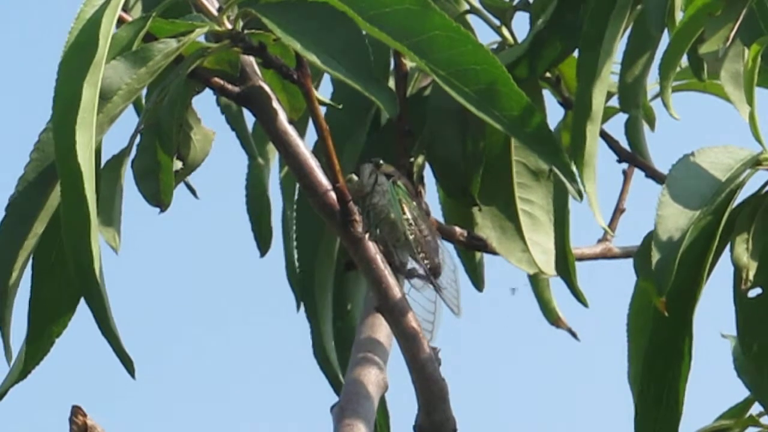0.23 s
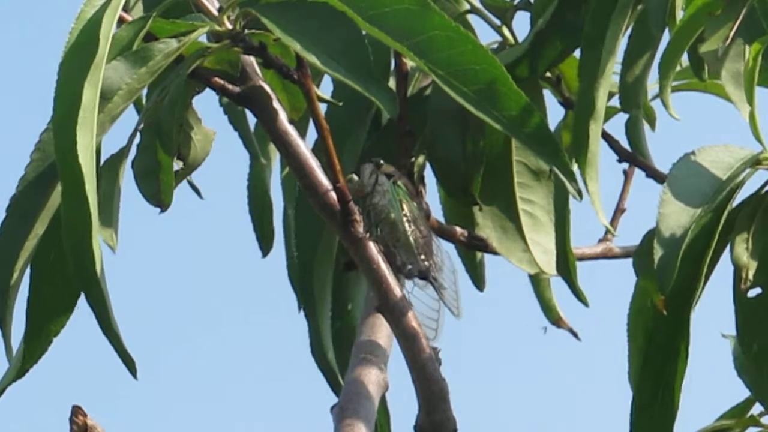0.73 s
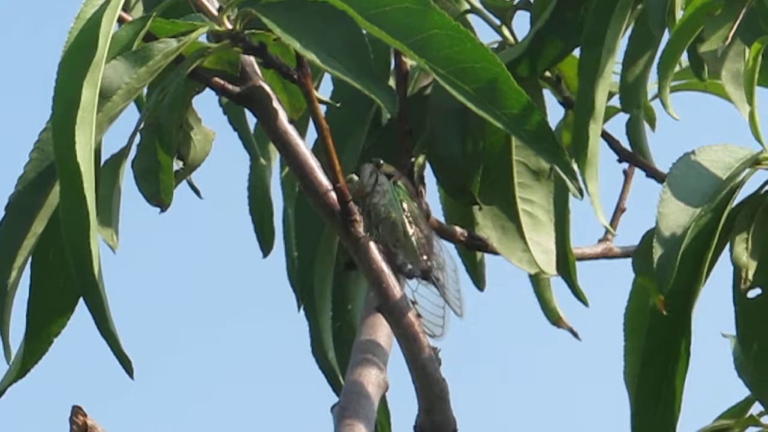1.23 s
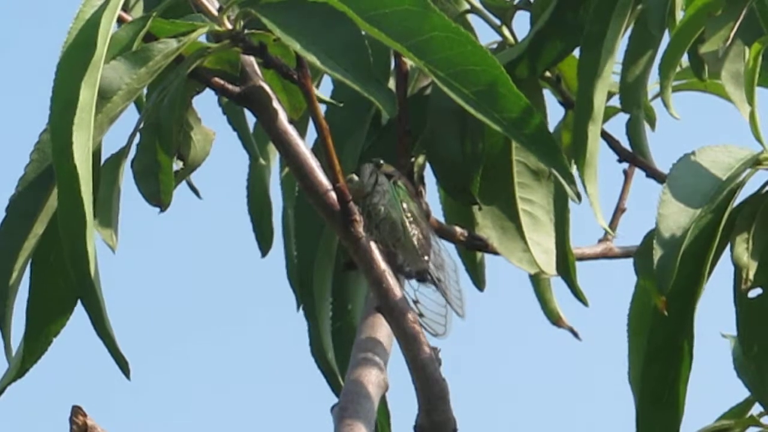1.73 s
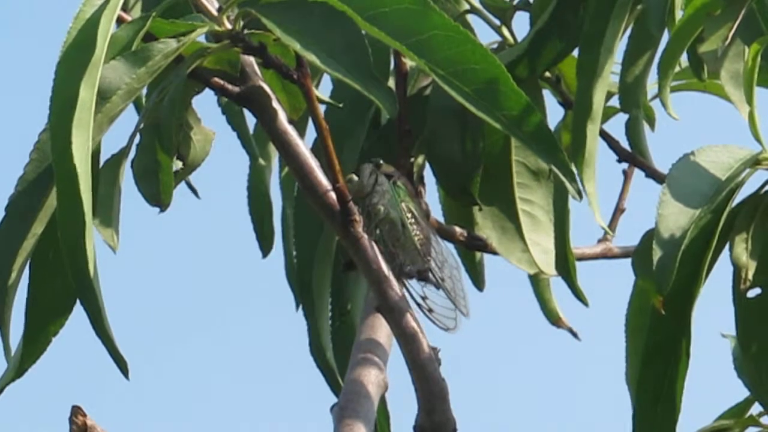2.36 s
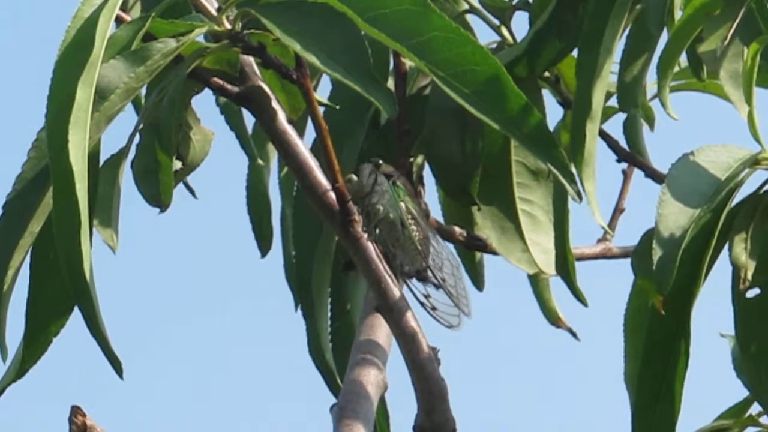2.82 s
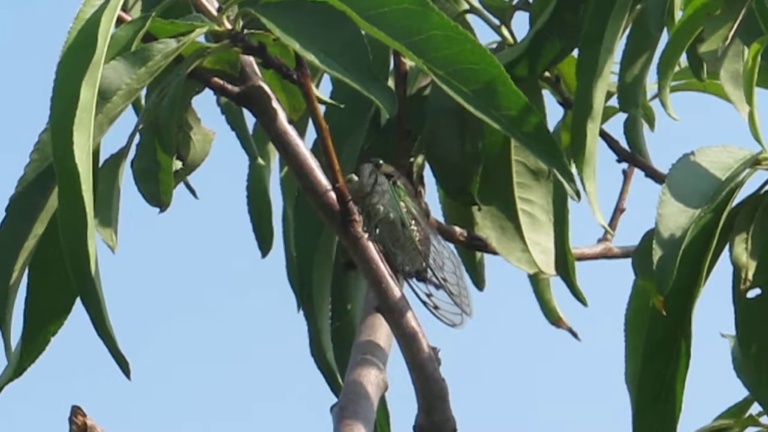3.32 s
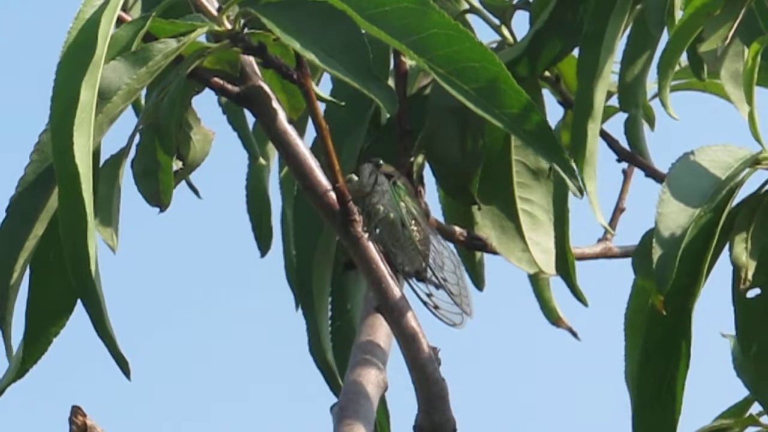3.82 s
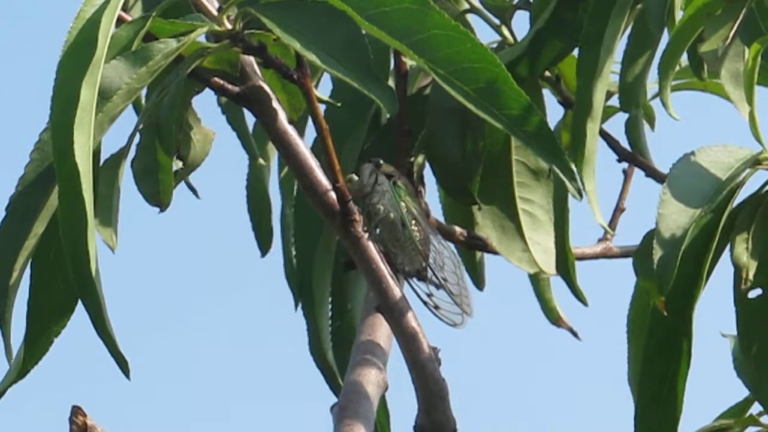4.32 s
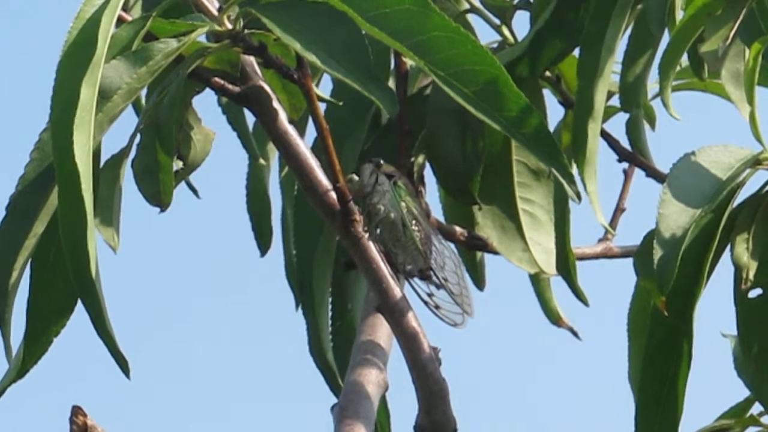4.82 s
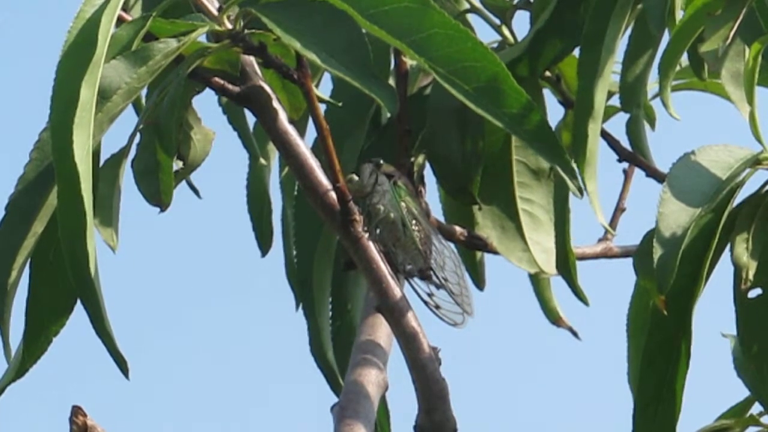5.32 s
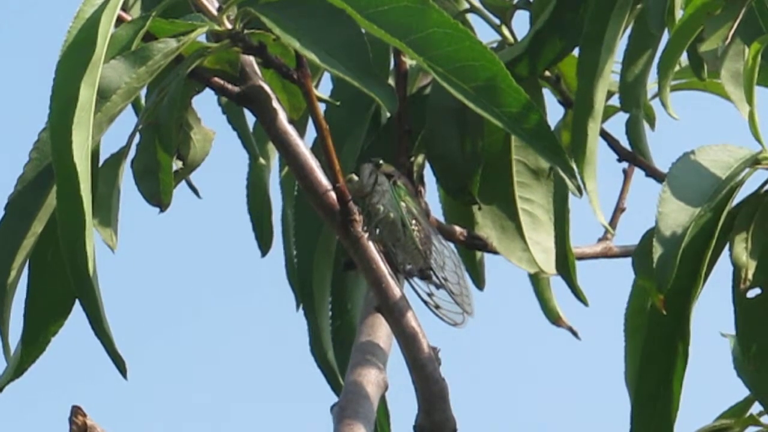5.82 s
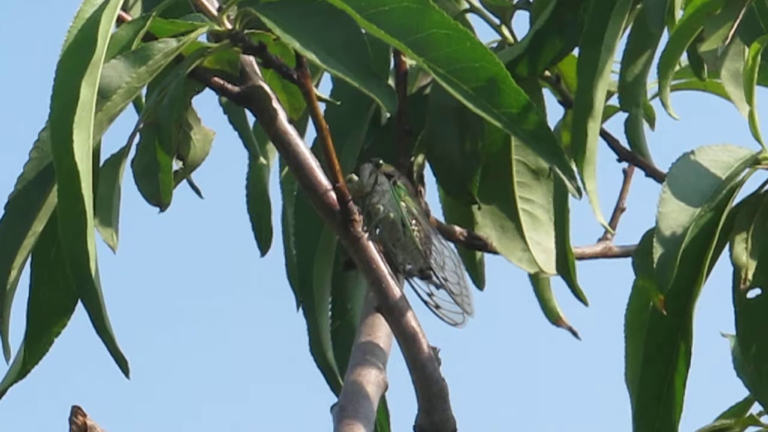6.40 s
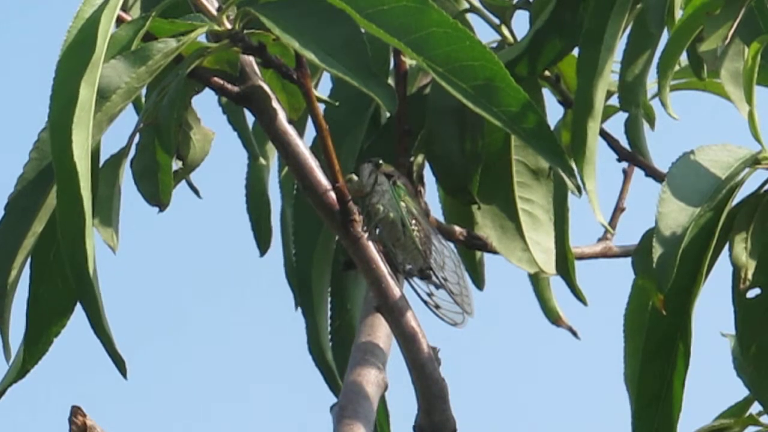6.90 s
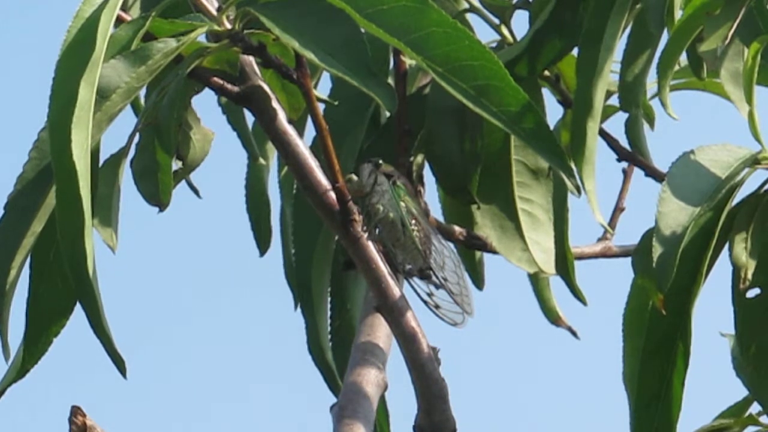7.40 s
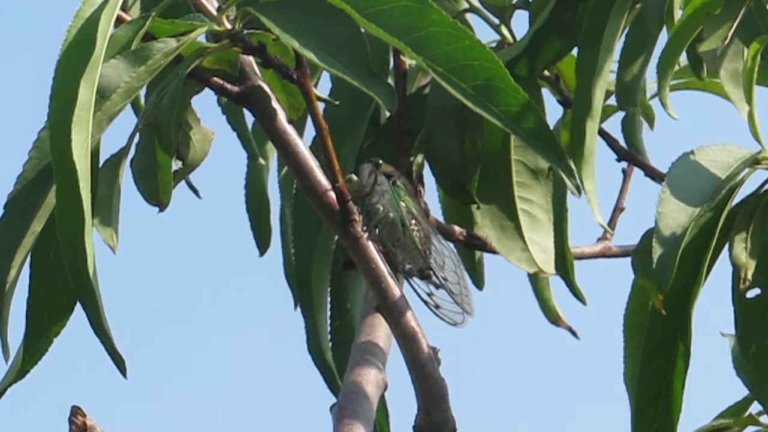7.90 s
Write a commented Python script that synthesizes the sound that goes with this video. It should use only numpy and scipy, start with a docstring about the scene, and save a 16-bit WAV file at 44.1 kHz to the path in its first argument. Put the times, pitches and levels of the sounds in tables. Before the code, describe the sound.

Loud, pulsing cicada buzz in a tree winds down to a ragged rattle and quits halfway, uncovering faint insects and steady low road noise.

```python
"""Cicada in a fruit tree, close to the microphones

A cicada's tymbals buckle rib by rib; each click rings fixed modes and a resonance swept by the pumping
abdomen. The throbbing buzz slows to a rattle, stumbles and stops. Leaves scatter it on its way.
Around it small insects tick (falling notes with a rasp) and chirp (pulsed bands of noise), and far ones hiss.
On a road some way off traffic swells and stays: shaped noise for rumble and tyres, a sine for the engine,
narrow noise for whines."""
import sys
import numpy as np
from scipy import signal
from scipy.fft import rfft, irfft, next_fast_len
from scipy.io import wavfile
from scipy.ndimage import uniform_filter1d

SR = 44100
rng = np.random.default_rng(int(sys.argv[2]) if len(sys.argv) > 2 else 0)


def master(y):
    """Save y as 16-bit WAV."""
    cut = np.clip(np.atleast_2d(y).T, -1, 1)
    pcm = np.round(cut * 32767)  # scale
    wavfile.write(sys.argv[1], SR, pcm.astype(np.int16))


N = 359856
TIME = np.arange(N) / SR

# The last stumbling strokes. Each row: time in seconds, level in dB beside a steady stroke.
LAST_STROKES = [(4.198, -0.5), (4.217, -1.5), (4.223, -2), (4.233, -0.5), (4.244, 2), (4.255, 0),
                (4.281, -4), (4.293, -8), (4.298, -3), (4.311, -0.5)]


def vigour_at(s, full_song_s=0.92, tiring_s=0.71):
    """The insect's vigour: 1 in full song, then fading towards 0 with the tiring time constant."""
    return np.exp(-np.maximum(s - full_song_s, 0) / tiring_s)


def rib_clicks(stroke_jitter=0.011, tired_jitter=0.0404, rib_jitter_ms=0.064, scatter_db=1.42):
    """Each muscle stroke buckles four ribs in turn; gives time, level and pitch ratio of every click."""
    # Pace of the muscle. Each row: time in seconds, strokes per second, gap between ribs in ms.
    stroke_pace = [(0, 238, 1.07), (.4, 222, 1.28), (.8, 228, 1.11), (1.3, 197, 1.19), (2, 180, 1.28),
                   (2.45, 149, 1.45), (3.25, 114, 1.4), (3.42, 120, 1.3), (3.7, 112, 1.33),
                   (4.2, 94.5, 1.26)]
    # Ribs in buckling order. Each row: place in rib gaps, level in dB in full song,
    # level in dB when tired, pitch ratio of the abdomen's ring.
    ribs = [(0, 0, -8, 0.92), (1, -3.5, 2, 0.98), (2, 0, -8.5, 1.034), (3, -1.5, -.5, 1.055)]
    last_s, last_db = np.transpose(LAST_STROKES)
    strokes_so_far = np.cumsum(curve(stroke_pace, TIME)[0]) / SR
    steady_count = int(np.interp(last_s[0], TIME, strokes_so_far))
    steady_s = np.interp(np.arange(steady_count), strokes_so_far, TIME)
    start = np.r_[steady_s, last_s]
    stroke_db = np.r_[0 * steady_s, last_db]
    # column 0 shifts the stroke, 1-4 shift its ribs, 5-8 scatter their levels
    chance = rng.standard_normal((900, 9))[:len(start)]
    rate, gap_ms = curve(stroke_pace, start)
    vigour = vigour_at(start)[:, None]
    # the strokes grow less even as the insect tires
    jitter = vigour * stroke_jitter + (1 - vigour) * tired_jitter
    start = start[:, None] + chance[:, :1] / rate[:, None] * jitter
    order, full_db, tired_db, ratio = np.transpose(ribs)
    when = start + (order * gap_ms[:, None] + rib_jitter_ms * chance[:, 1:5]) / 1000
    rib_db = vigour * full_db + (1 - vigour) * tired_db
    db = stroke_db[:, None] + rib_db + scatter_db * chance[:, 5:]
    return when.ravel(), db.ravel(), np.tile(ratio, len(start))


def cicada(abdomen_db=0, abdomen_ms=0.49, pause_at=.815, pause_width=0.068, pause_db=25,
           detune=0.031, song_db=3, first_crest_s=.047):
    """Rib clicks ring the swept abdomen and the fixed modes of the tymbal and thorax."""
    # Unsteady pumping of the abdomen. Each row: time in seconds, pumps per second.
    pump_pace = [(0, 16.07), (.98, 18.29), (1.02, 18.81), (2.25, 18.64), (3.26, 16.69), (3.48, 18.57),
                 (3.95, 14.97), (4.2, 18.3)]
    # One pump from crest to crest. Each row: share of the cycle, abdomen resonance in Hz in full song,
    # the same in Hz when tired (both before rib ratio and detuning), level in dB at full throb.
    pump_cycle = [(0, 5950, 4600, 4.5), (.12, 4940, 4260, 1.5), (.26, 4100, 3650, -4),
                  (.42, 3000, 3380, -1), (.56, 4100, 3760, -.3), (.68, 5150, 4600, -.3),
                  (.8, 5950, 5300, 1.3), (.88, 6750, 5900, 2.5)]
    # Each row: time in seconds, factor on the pump's level in dB.
    throb_depth = [(0, 1), (2.1, 1.3), (2.9, 0.22), (3.4, 0.77), (3.8, .15)]
    # Each row: mean frequency in Hz, decay in ms, level in dB in full song, level in dB when tired.
    tymbal_modes = [(4730, 1.6, -22, -9), (6170, .8, -2, -1), (6950, .7, -1, -6), (8050, .4, -4.3, -3.8),
                    (10200, .25, -29.5, -10.5), (12000, .07, -15.5, -6)]
    # Loudness at the insect. Each row: time in seconds, level in dB before song_db is added.
    song_level = [(0, -24.8), (.6, -24), (1.4, -26), (2, -25.5), (2.9, -29.5), (3.2, -30), (3.33, -26.8),
                  (3.95, -28.5), (4.2, -30)]
    when, db, ratio = rib_clicks()
    pumps = np.cumsum(curve(pump_pace, TIME)[0]) / SR
    phase = (np.interp(when, TIME, pumps) - np.interp(first_crest_s, TIME, pumps)) % 1
    share, *columns = np.transpose(pump_cycle)
    full_hz, tired_hz, pump_db = (np.interp(phase, share, c, period=1) for c in columns)
    vigour = vigour_at(when)
    throb = curve(throb_depth, when)[0]
    abdomen_hz = vigour * full_hz + (1 - vigour) * tired_hz
    # in full song the tymbals rest for a moment just before each crest
    pause = np.exp(-((phase - pause_at) / pause_width) ** 8)
    gain = undb(db + throb * pump_db - pause_db * vigour * pause)
    spread = rng.standard_normal((len(when), 1 + len(tymbal_modes))).T
    click_hz = abdomen_hz * ratio * (1 + detune * spread[0])
    song = rings(when, click_hz, abdomen_ms, gain * undb(abdomen_db))
    for k, (mode_hz, decay_ms, full_db, tired_db) in enumerate(tymbal_modes):
        # the upper modes swing against the abdomen
        sign = 1 if k < 2 else -1
        mode_gain = sign * gain * undb(vigour * full_db + (1 - vigour) * tired_db)
        # broad modes vary more from click to click than sharp ones
        varied_hz = mode_hz + 70 * spread[k + 1] / decay_ms
        song = song + rings(when, varied_hz, decay_ms, mode_gain)
    # the effort sets the loudness, averaged over several pumps; its divisor holds once the strokes stumble
    power = uniform_filter1d(song ** 2, size=9600)
    held_power = np.interp(np.minimum(TIME, LAST_STROKES[0][0]), TIME, power)
    effort = undb(curve(song_level, TIME)[0] + song_db) / np.sqrt(held_power)
    return song * effort


def tree(song, leaves_db=-10.5, leaves_t60=0.065, echo_db=-12, echo_s=.001675):
    """The song reaches the microphones directly, off one surface close by, and scattered by the leaves."""
    # The way from the insect to each microphone. Each row: frequency in Hz, gain in dB.
    to_left = [(1500, -31.5), (2400, -12), (3100, -1.5), (4200, 1), (4500, -1.5), (4850, 3), (5500, 1.5),
               (6200, -2), (6800, -13), (7400, -17), (8400, -19), (9400, -22.5), (12000, -18.5),
               (15500, -29)]
    to_right = [(1500, -31), (2400, -11.5), (3100, -1.5), (4200, 0), (4500, -4.5), (4750, -5), (5250, 1),
                (6200, 2.5), (6800, -1), (7400, 1.5), (8400, -1), (9400, -2.5), (12000, -5.5), (15500, -13)]
    song = song + undb(echo_db) * np.interp(TIME - echo_s, TIME, song)
    age = TIME[:8192]
    # decaying noise, starting 2 ms after the direct sound
    scatter = rng.standard_normal((2, len(age))) * undb(-60 * age / leaves_t60) * (age > .002)
    scatter *= undb(leaves_db) / np.sqrt(np.sum(scatter ** 2, axis=1))[:, None]
    sides = []
    for leaves, path in zip(scatter, (to_left, to_right)):
        leafy = signal.fftconvolve(song, leaves)[:N]
        sides.append(colour(song + leafy, path))
    return np.array(sides)


def tickers(crest=0.32, length=0.21):
    """Each wing stroke of a katydid scrapes a short falling note, with a faint broad rasp."""
    # Each row: strokes per second, time in seconds when one cycle starts, top of the note in Hz,
    # fall per cycle in Hz, waver in Hz, mean level in dB, rasp beside the note in dB, right minus left in dB.
    katydids = [(29.2, 4.331, 8680, 1500, 140, -45, -15.5, 18.5),
                (77.2, 4.334, 6150, 1500, 100, -47.5, -11, 0), (89.4, 4.34, 5900, 1500, 100, -53, -12, -1)]
    out = 0
    for rate, cycle_s, top_hz, fall_hz, waver_hz, db, rasp_db, right_db in katydids:
        phase = ((TIME - cycle_s) * rate + 0.036 * walk(5)) % 1
        hz = top_hz - fall_hz * phase + waver_hz * walk(900)
        tone = np.sin(2 * np.pi * np.cumsum(hz) / SR) * undb(2 * walk(700))
        rasp = undb(rasp_db + 2.6 * walk(30)) * noise_band(top_hz - fall_hz * crest, 3010)
        stroke = np.exp(-((phase - crest) / length) ** 2)
        level = undb(db + 0.78 * walk(20))
        out = out + place((tone + rasp) * stroke * level, right_db, lag_ms=0.023)
    return out


def chirpers(length=0.17):
    """Two small insects pulse narrow bands of noise into soft, high chirps, each at its own pace."""
    # Each row: middle of one chirp in seconds, chirps per second, pitch in Hz, width in Hz,
    # level in dB up to that chirp, fading after it in dB per second (negative grows).
    chirping_insects = [(4.412, 5.505, 9020, 300, -55.5, -0.5), (4.425, 6.15, 9730, 330, -59.5, 4)]
    out = 0
    for chirp_s, rate, hz, width_hz, db, fade_db in chirping_insects:
        phase = ((TIME - chirp_s) * rate + .5) % 1 - .5
        chirp = noise_band(hz, width_hz) * np.exp(-(phase / length) ** 2)
        out = out + chirp * undb(db - fade_db * np.maximum(TIME - chirp_s, 0))
    return place(out, right_db=12.0, lag_ms=0)


def traffic(rumble_db=2, tyres_db=1, drone_db=-7, diffuse_db=-11, rumble_waver_db=1.3,
            drone_waver_db=2.5, waver_hz=1.6, engine_hz=146.1, engine_sag_hz_per_s=1.05):
    """Low rumble, a wavering and slowly sinking engine drone and the roar of tyres, leaning to the right."""
    # The traffic draws near and stays. Each row: time in seconds, level in dB that all three parts follow.
    road_level = [(0, -47), (.95, -45), (4.16, -32), (8.16, -31.5)]
    # Outlines of the two noises. Each row: frequency in Hz, relative level in dB per Hz.
    rumble_shape = [(15, -18), (30, -10), (50, -1.5), (70, 0.5), (110, 0), (140, -4.5), (175, -11),
                    (220, -23), (400, -43.5), (2000, -100)]
    tyre_shape = [(100, -16.5), (200, 1), (290, -4), (360, -1.5), (450, -3), (620, -1.5), (800, 2.5),
                  (1000, -0.5), (1300, -2.5), (1700, -8), (2200, -13), (3000, -21.5), (4500, -27),
                  (9000, -40), (15000, -47)]
    # Brief surges of the rumble, swells of the drone. Each row: middle in seconds, length in seconds, rise in dB.
    rumble_surges = [(3.95, .35, 2), (5.2, 0.19, 5), (6.2, .25, 1.5)]
    drone_swells = [(1.8, .5, 4), (4.2, 1.23, 8), (6.7, .6, 3.5), (7.947, 0.69, 11.7)]
    road_db, = curve(road_level, TIME)
    surge_db = sum(db * swell(s, length) for s, length, db in rumble_surges)
    swell_db = sum(db * swell(s, length) for s, length, db in drone_swells)
    rumble_level_db = road_db + rumble_db + surge_db + rumble_waver_db * walk(4.014)
    rumble = unit(colour(rng.standard_normal(N), rumble_shape)) * undb(rumble_level_db)
    hz = engine_hz - engine_sag_hz_per_s * TIME + waver_hz * walk(12)
    drone_level_db = road_db + drone_db + swell_db + drone_waver_db * walk(12)
    drone = np.sqrt(2) * np.sin(2 * np.pi * np.cumsum(hz) / SR) * undb(drone_level_db)
    direct, *scattered = unit(colour(rng.standard_normal((3, N)), tyre_shape))
    # scattered sound differs between the microphones only at shorter wavelengths
    diffuse_shape = [(200, -14.5), (600, -5.0), (1200, 2.5), (3000, 3.5)]  # Hz, dB
    diffuse = colour(np.array(scattered), diffuse_shape) * undb(diffuse_db)
    tyres = (place(direct, right_db=2, lag_ms=0.077) + diffuse) * undb(road_db + tyres_db)
    return place(rumble + drone, right_db=2.6, lag_ms=0.054) + tyres


def whines(width_hz=14):
    """Far engines whine faintly: narrow bands of noise rise out of the traffic and sink back."""
    # Each row: middle in seconds, length in seconds, pitch in Hz, level in dB at the height.
    engine_whines = [(5.75, 0.27, 247, -38), (6.12, 0.2, 258, -39), (5.6, 2.2, 356, -47)]
    tones = sum(noise_band(hz, width_hz) * undb(db) * swell(s, length) for s, length, hz, db in engine_whines)
    return place(tones, right_db=1.5, lag_ms=.06)


def chorus(left_db=-51, right_db=-49):
    """Far insects merge into a fine shimmering hiss, separate noise at each microphone."""
    # Insects and air at each microphone. Each row: frequency in Hz, relative level in dB per Hz.
    left_shape = [(2000, -22), (3500, -5), (4800, 1.5), (5700, 1), (6200, -4), (6900, -14), (8200, -12),
                  (9500, -24), (12000, -26), (15500, -31)]
    right_shape = [(2000, -17), (3500, -27), (4800, -16), (5800, .5), (6600, -1), (7400, 3), (8200, 0),
                   (9500, -17), (12000, -28), (15500, -43)]
    sides = []
    for shape, db in ((left_shape, left_db), (right_shape, right_db)):
        hiss = unit(colour(rng.standard_normal(N), shape))
        sides.append(hiss * undb(db + 1.5 * walk(70)))
    return np.array(sides)


def undb(db):
    """Decibels to gain."""
    return 10 ** (np.asarray(db) / 20)


def curve(table, at):
    """The columns of a table, read at the given times."""
    s, *columns = np.transpose(table)
    return [np.interp(at, s, c) for c in columns]


def unit(x):
    """Scale to rms 1."""
    return x / np.sqrt(np.mean(x ** 2))


def colour(x, points):
    """Causal minimum-phase filter with the given (Hz, dB) outline."""
    hz, db = np.transpose(points)
    size = next_fast_len(N + 4096, True) // 2 * 2
    grid = np.maximum(np.arange(size // 2 + 1) * SR / size, 1)
    outline_db = np.interp(np.log(grid), np.log(hz), db)
    # folding the cepstrum onto positive times makes the filter causal
    cepstrum = irfft(np.log(undb(outline_db)))
    cepstrum[1:size // 2] *= 2
    cepstrum[size // 2 + 1:] = 0
    return irfft(rfft(x, size) * np.exp(rfft(cepstrum)))[..., :N]


def noise_band(hz, width_hz):
    """Noise of rms 1 in one bell-shaped band."""
    grid = np.arange(N // 2 + 1) * SR / N
    bell = np.exp(-2 * ((grid - hz) / width_hz) ** 2)
    return unit(irfft(rfft(rng.standard_normal(N)) * bell, N))


def walk(rate):
    """Smooth chance with a spread near 1, drawn anew about rate times per second."""
    k = int(SR / rate)
    steps = np.repeat(rng.standard_normal(N // k + 1), k)
    return 1.3 * uniform_filter1d(uniform_filter1d(steps, k), k)[:N]


def swell(middle_s, length_s):
    """A rounded rise, hold and fall between 0 and 1."""
    return np.exp(-(2 * (TIME - middle_s) / length_s) ** 4)


def place(x, right_db, lag_ms):
    """Set a source between the microphones: right minus left in dB, and the left's delay."""
    left = np.interp(TIME - lag_ms / 1000, TIME, x) * undb(-right_db / 2)
    return np.array([left, x * undb(right_db / 2)])


def rings(when, hz, decay_ms, gain, size=320):
    """A damped sine for every click, timed between samples."""
    index = np.ceil(when * SR).astype(int)[:, None] + np.arange(size)
    age = index / SR - when[:, None]
    decay = np.exp(-1000 * age / decay_ms)
    wave = gain[:, None] * decay * np.sin(2 * np.pi * np.reshape(hz, (-1, 1)) * age)
    return np.bincount(np.maximum(index, 0).ravel(), wave.ravel(), N)[:N]


def scene():
    """The cicada in its tree over the summer background."""
    return tree(cicada()) + tickers() + chirpers() + chorus() + traffic() + whines()


def record(dry, top_hz=15750):
    """The recorder cuts the top with a steep low-pass."""
    return signal.sosfilt(signal.ellip(10, .2, 80, top_hz, fs=SR, output="sos"), dry)


dry = scene()
out = record(dry)
master(out)
```